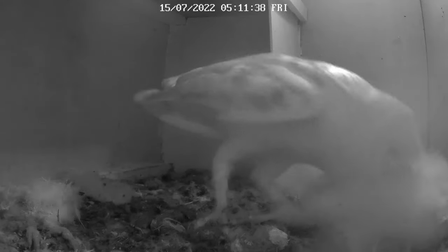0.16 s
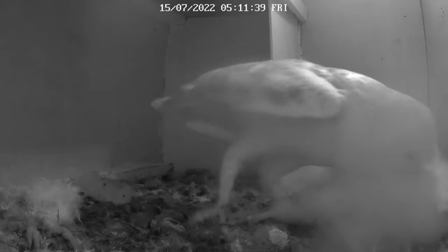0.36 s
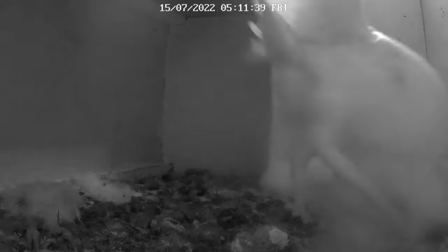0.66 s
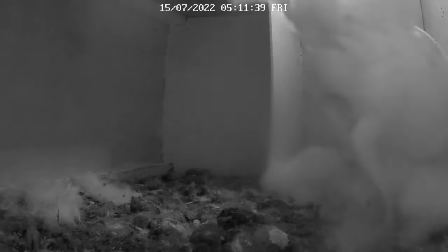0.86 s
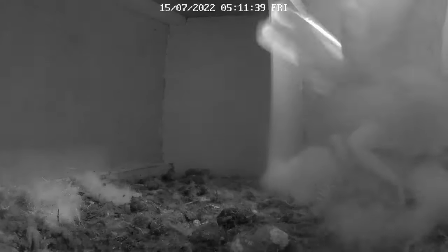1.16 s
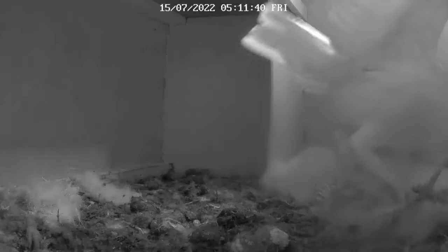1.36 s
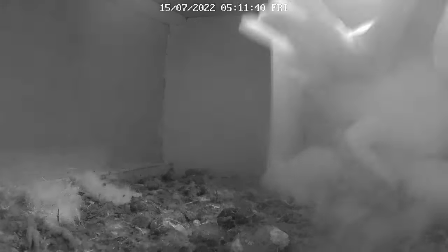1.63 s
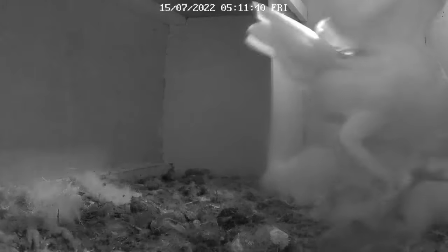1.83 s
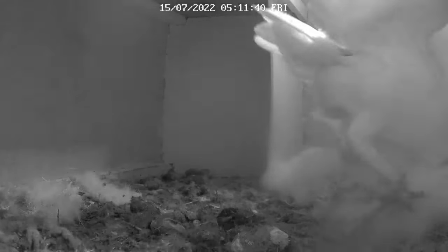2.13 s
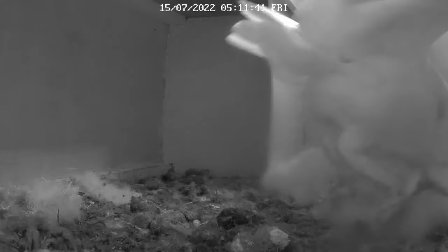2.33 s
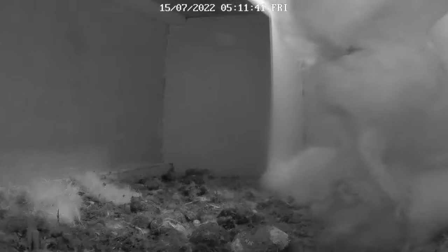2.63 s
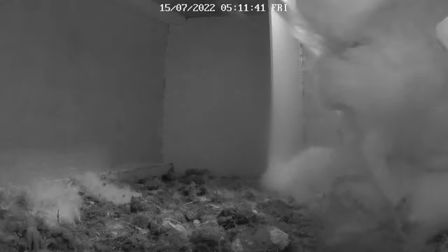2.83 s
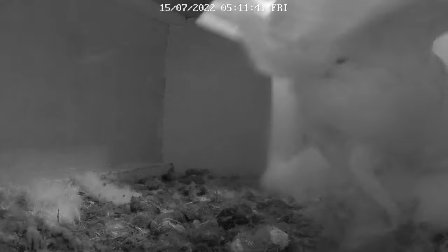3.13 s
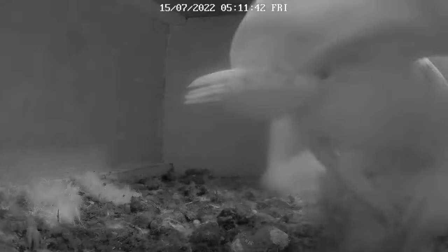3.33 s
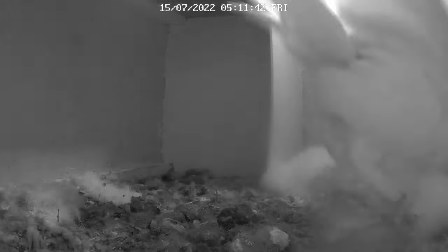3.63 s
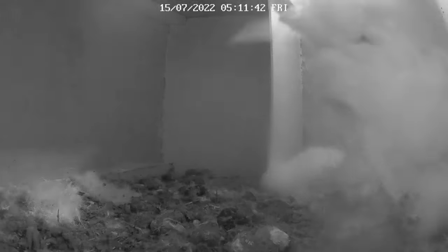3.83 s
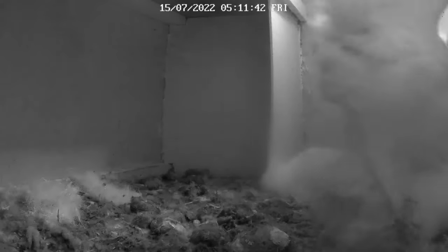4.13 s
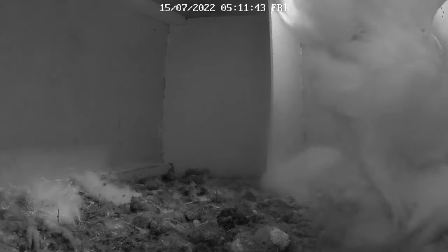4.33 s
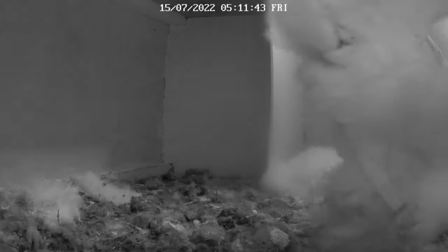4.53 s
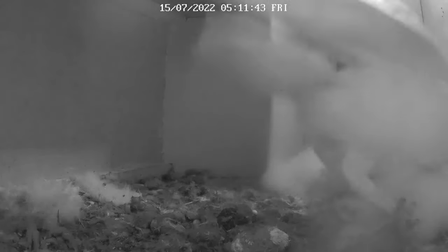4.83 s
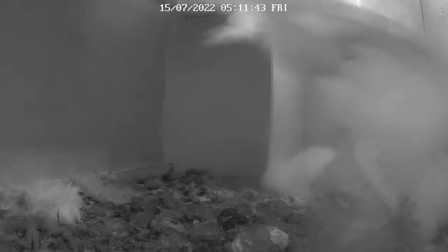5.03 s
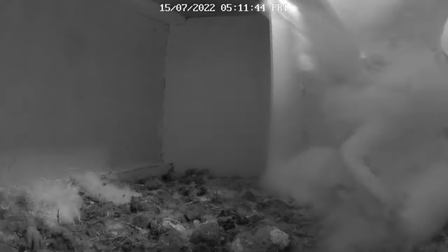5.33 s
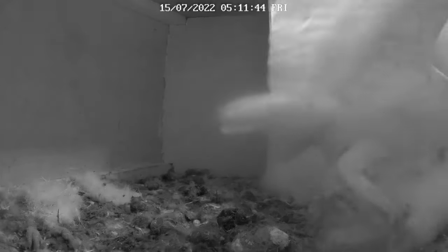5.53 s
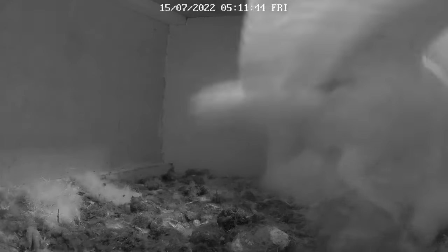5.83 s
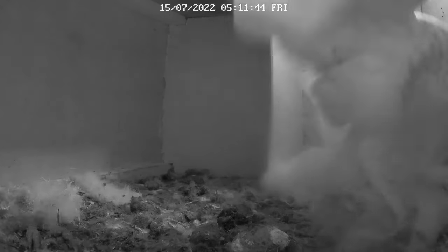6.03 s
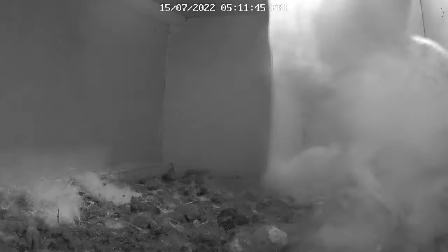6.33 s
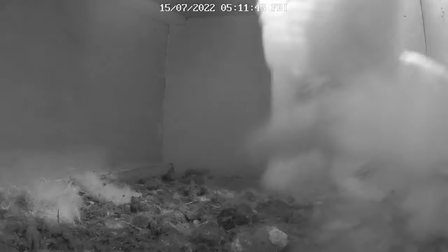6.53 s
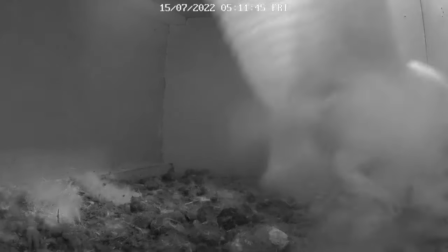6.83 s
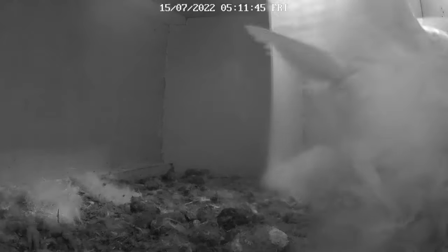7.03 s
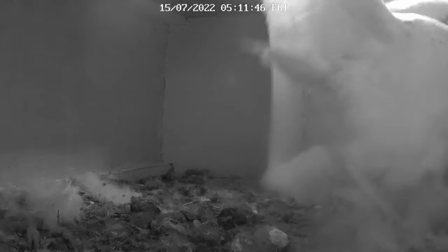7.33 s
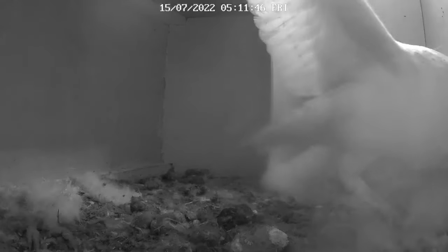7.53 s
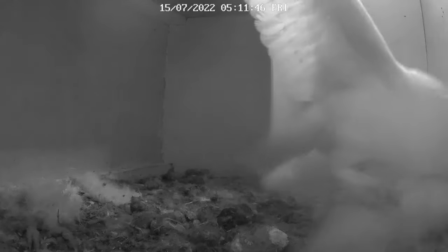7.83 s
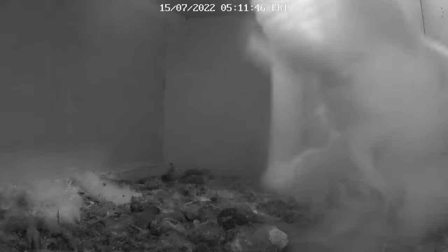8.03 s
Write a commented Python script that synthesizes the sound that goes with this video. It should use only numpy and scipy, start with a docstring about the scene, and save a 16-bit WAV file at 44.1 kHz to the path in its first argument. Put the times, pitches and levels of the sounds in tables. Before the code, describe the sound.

Young barn owls scuffle close to the microphone inside a wooden nest box at night. Small birds whistle faintly outside, then feet and wings thump the panels in irregular bursts, with light rustling and claw scratches. Past the middle an owl gives a short screech; a brief hiss, one very loud thump and a squeal follow. Distant coos and peeps continue over low microphone hiss and hum.

```python
"""Small birds whistle outside over night air, microphone hiss, mains hum and a thin whine.
Close by, young barn owls scuffle in a wooden nest box: feet and wings thump the panels,
feathers brush the litter and claws scratch, while far birds peep and coo.
Then an owl squeaks and gives three cries, each a squeal that breaks into a screech or a hiss."""
import sys
import numpy as np
from scipy import signal
from scipy.fft import rfft, irfft, next_fast_len
from scipy.io import wavfile

SR = 44100
rng = np.random.default_rng(int(sys.argv[2]) if len(sys.argv) > 2 else 0)


def put_to_file(sound):
    """Save the sound as 16-bit audio at rate SR, in the file named by the first command-line argument."""
    columns = np.atleast_2d(sound).T  # one column per channel
    safe = np.clip(columns, -1, 1)
    whole_steps = np.round(safe * 32767)
    wavfile.write(sys.argv[1], SR, whole_steps.astype(np.int16))


N = 360297
TIME = np.arange(N) / SR


def from_db(db):
    """Decibels to gain."""
    return 10 ** (np.asarray(db) / 20)


def rms_one(x):
    """Scale to rms 1."""
    return x / np.sqrt(np.mean(x ** 2) + 1e-20)


def gain_at(spectrum, hz):
    """Gain from a (Hz, dB) table, on a log-frequency axis."""
    points_hz, db = np.transpose(spectrum)
    return from_db(np.interp(np.log(hz + 1e-3), np.log(points_hz), db))


def cut(x, hz, kind="low", order=2):
    """Butterworth low- or high-pass."""
    return signal.sosfilt(signal.butter(order, min(hz, .45 * SR), kind, fs=SR, output="sos"), x)


def noise(spectrum):
    """Noise shaped by a (Hz, dB) table, rms 1."""
    size = next_fast_len(N)
    gains = gain_at(spectrum, np.fft.rfftfreq(size, 1 / SR))
    return rms_one(irfft(rfft(rng.standard_normal(size)) * gains, size)[:N])


def drift(per_s):
    """Interpolated random values, rms 1."""
    knots = rng.standard_normal(N // 20)
    return rms_one(np.interp(TIME * per_s, np.arange(len(knots)), knots))


def ring(x, hz, t60_s):
    """Resonator: a unit click starts a decaying sine of height 1."""
    r, w = from_db(-60 / (t60_s * SR)), 2 * np.pi * hz / SR
    return signal.lfilter([0, np.sin(w)], [1, -2 * r * np.cos(w), r * r], x + 1e-18)


def echoes(x, t60_s):
    """Convolve with a diffuse tail of unit energy."""
    tail = rng.standard_normal(SR) * from_db(-60 * TIME[:SR] / t60_s)
    return signal.fftconvolve(x, tail / np.linalg.norm(tail))[:N]


def envelope(t, length_s, attack_s, release_s):
    """Linear attack, hold and release; 0 outside."""
    return np.clip(np.minimum(t / attack_s, (length_s - t) / release_s), 0, 1)


def add(out, start_s, sound):
    """Mix a sound in at start_s."""
    at = max(round(start_s * SR), 0)
    out[at:at + len(sound)] += sound[:max(N - at, 0)]


# Noise floor spectrum. Each row: frequency in Hz, relative level in dB.
FLOOR_SPECTRUM = [(15, -28.5), (25, 2.5), (59, -4.5), (155, -10), (227, -6), (358, -20), (434, -2.5),
                  (717, -31.5), (869, -20), (1370, -32.5), (1830, -33.5), (4650, -33.5), (5000, -30),
                  (5370, -34), (7700, -36.5), (10000, -68.5), (16900, -120)]

def background(floor_db=-60, hum_hz=50, hum_db=-62, whine_hz=5091, whine_db=-82):
    """Night air and microphone hiss, mains hum and a flickering electronic whine."""
    hum = from_db(hum_db) * np.sin(2 * np.pi * hum_hz * TIME)
    whine = from_db(whine_db) * np.sin(2 * np.pi * whine_hz * TIME) * (1 + 0.48 * drift(50))
    return from_db(floor_db) * noise(FLOOR_SPECTRUM) + np.sqrt(2) * (hum + whine)


def whistle(length_s, start_hz, middle_hz, end_hz, jitter):
    """One note bends through three pitches, swelling and fading."""
    u = np.linspace(0, 1, int(length_s * SR))
    glide = np.polyfit([0, .5, 1], [start_hz, middle_hz, end_hz], 2)
    hz = np.polyval(glide, u) * (1 + jitter * drift(600)[:len(u)])
    return np.sqrt(4 * u * (1 - u)) * np.sin(2 * np.pi * np.cumsum(hz) / SR)


# Near whistles. Each row: start and length in seconds, start and end pitch in Hz, level in dB.
NEAR_CHIRPS = [(0.048, 0.068, 6410, 4160, -57.5), (0.079, 0.058, 3640, 4570, -66.5),
               (0.213, .077, 6280, 4370, -57.5), (0.158, .022, 5500, 6000, -63.5),
               (0.163, 0.036, 3730, 4170, -66), (0.534, .046, 6800, 5800, -65.5),
               (0.564, 0.039, 6040, 6340, -66), (0.543, .079, 4790, 4000, -64),
               (0.708, 0.067, 4980, 4630, -43.5), (1.369, 0.041, 5840, 4970, -72),
               (1.407, .083, 4400, 3900, -56.5), (2.42, 0.095, 3690, 3210, -76),
               (7.423, .14, 3810, 3740, -69.5)]
# Far peeps. Each row: start in seconds, relative level in dB.
FAR_PEEPS = [(1.461, -63.5), (3.036, -61), (4.565, -65), (5.97, -58.5), (7.765, -53.5)]

def small_birds():
    """Nearer birds whistle cleanly; a farther one repeats a raspy peep that swells as it rises."""
    near, far = np.zeros((2, N))
    for start_s, length_s, start_hz, end_hz, db in NEAR_CHIRPS:
        middle_hz = start_hz + 0.55 * (end_hz - start_hz)
        add(near, start_s, from_db(db) * whistle(length_s, start_hz, middle_hz, end_hz, jitter=0.011))
    for start_s, db in FAR_PEEPS:
        peep = whistle(.125, 2800, 3780, 4050, jitter=0.026)
        add(far, start_s, from_db(db - 4) * peep * np.linspace(.4, 1.3, len(peep)))
    return near + far + echoes(from_db(-10) * near + far, t60_s=0.19)


# Panel modes. Each row: frequency in Hz, weight in dB, T60 in seconds.
PANEL_MODES = [(107.9, -10, 0.4), (134.6, -3, 0.21), (165, -11, 0.18), (221.2, -10, 0.26),
               (294.5, 7.5, 0.029), (359.4, 7, 0.029), (390, -3, 0.11), (422, -15, 0.36), (505.6, 6.5, .13),
               (547, -25.5, 0.041), (824, -21.5, 0.12), (890, -16.5, 0.038), (1050, -29.5, 0.049)]

def panel_modes(force):
    """A force rings the wooden panels; returns (Hz, signal) for each mode."""
    return [(hz, from_db(db) * ring(force, hz, t60_s)) for hz, db, t60_s in PANEL_MODES]


# Response of the box interior. Each row: frequency in Hz, relative level in dB.
HOLLOW_SPECTRUM = [(600, 5.5), (1200, -1.5), (1500, -25), (1750, -12), (2150, 0.5), (2500, -31.5),
                   (2900, 3), (3300, -14), (4050, 5.5), (4600, -7), (5150, -9.5), (6000, -9), (7200, -25)]

def hollow_noise():
    """Noise coloured by the hollow of the box."""
    return noise(HOLLOW_SPECTRUM)


# Trampling bouts. Each row: start and length in seconds, rumble and rustle level in dB.
SHUFFLE_BOUTS = [(0.889, 0.73, -48, -68.5), (1.312, 0.96, -63, -76), (2.7, 0.26, -56.5, -79),
                 (3.53, 0.35, -60, -81), (5.44, 0.34, -50, -74), (5.81, 0.76, -66.5, -71.5),
                 (6.82, .2, -66, -70), (7.377, 0.32, -50, -72), (7.68, 0.94, -55, -68)]

def shuffling(touches_per_s=130, bout_fade_db=8):
    """Many light touches keep the panels rumbling while feathers brush the litter."""
    rumble_gain, rustle_gain = from_db(-70), from_db(-86)  # the owls never sit quite still
    for start_s, length_s, rumble_db, rustle_db in SHUFFLE_BOUTS:
        t = TIME - start_s
        slack = from_db(-bout_fade_db * np.clip(t / length_s, 0, 1))
        effort = slack * envelope(t, length_s, attack_s=0.036, release_s=0.079)
        rumble_gain = rumble_gain + from_db(rumble_db) * effort
        rustle_gain = rustle_gain + from_db(rustle_db) * effort
    touches = (rng.random(N) < touches_per_s / SR) * rng.standard_normal(N)
    panels = cut(sum(mode for _, mode in panel_modes(touches)), 426, order=4)
    feathers = cut(hollow_noise(), 900, "high")
    grain_db, brush_db = 2.5 * drift(190), 4.5 * drift(45)
    feathers *= from_db(grain_db + brush_db)
    return rumble_gain * rms_one(cut(panels, 83, "high")) + rustle_gain * rms_one(feathers)


def hollow_dip(x, notch_hz=690):
    """The box passes little just above its strong low modes."""
    return signal.lfilter(*signal.iirnotch(notch_hz, Q=3.5, fs=SR), x)


# Blows. Each row: start in seconds, body peak in dB, contact pitch in Hz, low-mode boost in dB.
PANEL_BLOWS = [(0.963,-26.5,206,-4.5), (1.016,-28.5,240,6), (1.041,-33,240,7), (1.065,-33,137,8),
               (1.168,-45,270,9), (1.236,-13.5,386,1.5), (1.822,-27.5,142.4,-8), (2.029,-40.5,390,-6),
               (2.08,-38.5,298,-15), (2.277,-37.5,320,-3), (2.781,-35.5,290,-4.5), (4.246,-18,161,-4),
               (5.416,-11.5,181,3.5), (5.955,-27,382,3.5), (6.501,-30,131,-5.5), (7.313,1.5,278,0.5),
               (7.556,-26,165,6), (8.154,-27.5,154,6)]

def thumps(boom_below_hz=250, crack_decay_s=0.013, leak_hz=75):
    """A foot or wing pushes a panel and lets go; where it lands sets how much the low modes boom."""
    out, t = np.zeros(N), TIME[:SR // 2]
    impulse = 1. * (t == 0)
    for start_s, peak_db, contact_hz, boom_db in PANEL_BLOWS:
        push = -np.diff(cut(impulse, 1.337 * contact_hz, order=4), prepend=0)
        body = sum(mode * from_db(boom_db * (hz < boom_below_hz)) / hz for hz, mode in panel_modes(push))
        body = hollow_dip(cut(body, leak_hz, "high", order=3))  # the microphone hears little deep bass
        burst = rng.standard_normal(len(t)) * np.exp(-t / crack_decay_s)
        crack = hollow_dip(cut(cut(burst, 930, order=12), 240, "high"))
        crack_db = -24.5 + 19.5 * np.log2(contact_hz / 300)  # harder contacts crack more
        blow = body / abs(body).max() + from_db(crack_db) * crack / abs(crack).max()
        add(out, start_s, from_db(peak_db) * blow)
    return out + from_db(-13) * echoes(cut(out, 260), t60_s=0.23)  # the other walls shudder along


# Claws and beaks on wood. Each row: start in seconds, relative level in dB, decay in seconds.
CLAW_STROKES = [(1.2494, -50, .006), (1.4253, -55, 0.0051), (1.4545, -44, 0.0031), (3.5445, -54, 0.0076),
                (3.633, -53, 0.0076), (5.4766, -44.5, 0.0091), (5.8696, -57, .021), (5.892, -52.5, 0.0083),
                (5.9539, -38.5, 0.0041), (6.5225, -47.5, 0.0053), (6.846, -56, 0.025), (6.9326, -53, 0.029),
                (6.953, -56, 0.012), (7.032, -54.5, 0.049), (7.5596, -53, 0.0089), (7.763, -44.5, 0.008),
                (7.885, -55.5, .007)]

def scratches(rise_s=0.00069, bite_hz=2250):
    """Each stroke is a short burst ringing in the hollow box, with the bite of hard wood."""
    force, t = np.zeros(N), TIME[:SR // 5]
    for start_s, db, decay_s in CLAW_STROKES:
        stroke = (1 - np.exp(-t / rise_s)) * np.exp(-t / decay_s)
        add(force, start_s, from_db(db - 5) * stroke / stroke.max())
    bite = from_db(-7) * rms_one(ring(rng.standard_normal(N), bite_hz, t60_s=0.0035))
    friction = rms_one(cut(hollow_noise() + bite, 150, "high"))
    return hollow_dip(force * friction)


# Dove-like notes. Each row: start and length in seconds, first and last pitch in Hz,
# level and fade over the note in dB.
FAR_COOS = [(1.5, .35, 425.3, 597, -52.5, 3.5), (2.154, .32, 485, 418.3, -59, -1),
            (2.71, 0.25, 526.3, 425.5, -50.5, 2.5), (3.02, .08, 554, 448, -52, 5),
            (3.14, 0.34, 448, 446.5, -50.5, 7.5), (3.745, .22, 488.4, 582, -50.5, 9.5),
            (4.231, 0.27, 537, 551, -50.5, 11), (4.859, .4, 506.6, 408.3, -55.5, 1.5),
            (5.536, .21, 545.3, 406.7, -43, 11.5), (5.862, 0.068, 552, 540, -43.5, 8.5),
            (6.016, .33, 467.4, 458.6, -49, 8.5), (6.632, 0.38, 520, 566.4, -53.5, 8.5),
            (7.135, 0.5, 525.3, 529.5, -47.5, 3), (7.769, 0.17, 489.3, 437, -53, -6.5),
            (7.966, .25, 487, 395.7, -44, 8.5)]

def coos(jitter=0.022, flutter_db=2.5, husk_db=-11, scoop_s=0.0193, droop_s=.022):
    """Wavering, husky low notes scoop up, glide and droop, blurred by distance."""
    out, waver = np.zeros(N), 1 + jitter * drift(110)
    husk = from_db(husk_db) * (drift(120) + 1j * drift(120)) / np.sqrt(2)  # widens the tone to a band
    for start_s, length_s, first_hz, last_hz, db, fade_db in FAR_COOS:
        on = (TIME > start_s) & (TIME < start_s + length_s)
        t = TIME[on] - start_s
        bend = 1 - 0.1773 * np.exp(-t / scoop_s) - .16 * np.exp((t - length_s) / droop_s)
        hz = (first_hz + (last_hz - first_hz) * t / length_s) * bend * waver[on]
        note = np.sqrt(2) * np.real((1 + husk[on]) * np.exp(2j * np.pi * np.cumsum(hz) / SR))
        gate = envelope(t, length_s, attack_s=0.025, release_s=0.023)
        out[on] += from_db(db - fade_db * t / length_s) * gate * note
    out *= from_db(flutter_db * drift(45))
    return out + from_db(-6) * echoes(out, t60_s=0.51)


# Weighting of the squeal's partials. Each row: frequency in Hz, relative level in dB.
SQUEAL_SPECTRUM = [(1250, -16), (1500, -14), (2500, 1.5), (3000, -0.5), (3800, 10.5), (4350, 2),
                   (4800, -14.5), (5800, -43), (7400, -28.5), (8000, -63)]

def squeal(hz):
    """The owl's clear voice: five harmonics on a pitch curve, rms 1."""
    phase = 2 * np.pi * np.cumsum(hz) / SR
    gains = [gain_at(SQUEAL_SPECTRUM, k * hz) for k in range(1, 6)]
    tone = sum(gain * np.sin(k * phase) for k, gain in enumerate(gains, 1))
    return tone / np.sqrt(sum(gain ** 2 for gain in gains) / 2)


# Screech spectrum. Each row: frequency in Hz, relative level in dB.
SCREECH_SPECTRUM = [(600, -54), (1650, -46), (1920, -12), (2400, -41), (3150, -37), (3400, -16), (3700, -2),
                    (4180, 7.5), (4500, -6.5), (4700, -18.5), (5900, -33), (6750, -33.5), (7600, -54)]

def screech():
    """The forced voice turns chaotic: bands of noise."""
    return noise(SCREECH_SPECTRUM)


# Hiss resonances of the box. Each row: frequency and bandwidth in Hz, relative level in dB.
BOX_HISS_RESONANCES = [(1530, 52, -11), (2190, 50, -9.5), (2916, 60, -11.5), (3580, 50, -12.5), (3970, 41, 1),
                       (5160, 120, -11.5), (6500, 200, -13), (6860, 110, -15.5)]

def breathy_hiss():
    """Rushing air rings in the narrow resonances of the box."""
    white = rng.standard_normal(N)
    bands = sum(from_db(db) * rms_one(ring(white, hz, t60_s=np.log(1000) / (np.pi * width_hz)))
                for hz, width_hz, db in BOX_HISS_RESONANCES)
    return rms_one(rms_one(bands) + from_db(-5) * hollow_noise())


# Cries. Each row: start and length in seconds, start, held and end pitch in Hz, squeal level in dB,
# break start and length in seconds, roughness 0-1, level the noise swells to in dB, hiss share 0-1.
OWL_CRIES = [(4.717, 0.038, 2155, 2116, 2040, -64, 4.72, 0.043, 0.3, -67, 0.7),
             (5.17, 0.237, 1490, 1620, 1530, -53.5, 5.18, 0.21, 0.9, -34, .02),
             (7.072, 0.177, 1880, 1770, 1350, -60.5, 7.04, .18, .97, -48.5, 0.98),
             (8.04, 0.14, 1240, 1552, 1324, -35.5, 8.083, 0.051, 0.63, -37.5, 0.01)]

def owl(jitter=0.006, flutter_db=1.56, glide_in_s=0.069, glide_out_s=0.06, swell_db_per_s=98):
    """A squeal glides, holds and sinks; forced, it breaks into a swelling screech or hiss."""
    chaos, rush = cut([screech(), breathy_hiss()], 500, "high", order=4)
    waver, out = jitter * drift(600), np.zeros(N)
    for (start_s, length_s, start_hz, held_hz, end_hz, squeal_db,
         break_s, broken_s, roughness, noise_db, hiss_share) in OWL_CRIES:
        on = (TIME > start_s) & (TIME < start_s + length_s)
        t, since_break_s = TIME[on] - start_s, TIME[on] - break_s
        broken = envelope(since_break_s, broken_s, attack_s=0.42 * broken_s, release_s=0.022)
        hz = held_hz + (start_hz - held_hz) * np.maximum(1 - t / glide_in_s, 0) ** 2
        hz += (end_hz - held_hz) * np.maximum(1 - (length_s - t) / glide_out_s, 0)
        hz *= 1 + waver[on] * (1 + 4 * roughness * broken)
        tone = from_db(squeal_db) * (1 - roughness * broken) * squeal(hz)
        air = np.sqrt(1 - hiss_share) * chaos[on] + np.sqrt(hiss_share) * rush[on]
        swell = from_db(noise_db - swell_db_per_s * (broken_s - since_break_s))
        out[on] += envelope(t, length_s, attack_s=0.015, release_s=.014) * (tone + swell * broken * air)
    out *= from_db(flutter_db * drift(250))
    return out + from_db(-15) * echoes(out, t60_s=0.16)  # box reverberation


def scene():
    """Everything as heard inside the box, mono."""
    return (thumps() + scratches() + shuffling() + owl() + coos() + small_birds() + background())[None]


def record(dry):
    """The camera limits hard at full scale and cuts the treble."""
    cutoff_hz = 7750
    lowpass = signal.ellip(12, .1, 80, cutoff_hz, fs=SR, output="sos")
    return signal.sosfilt(lowpass, np.clip(dry, -1, 1))


dry = scene()
out = record(dry)
put_to_file(out)
```